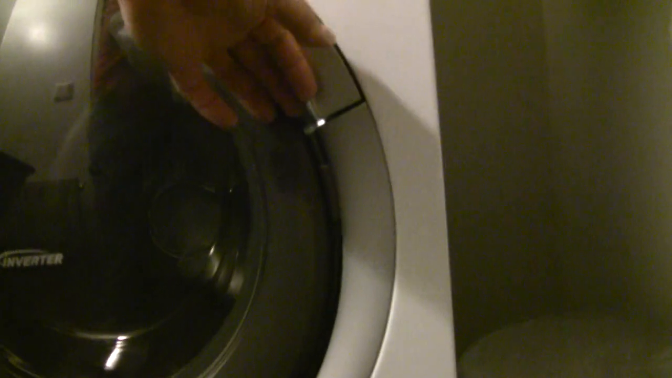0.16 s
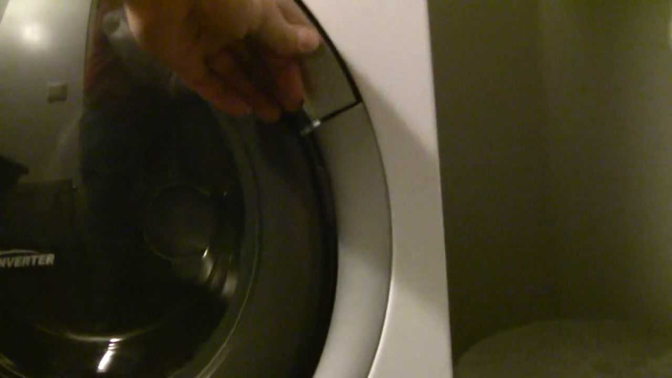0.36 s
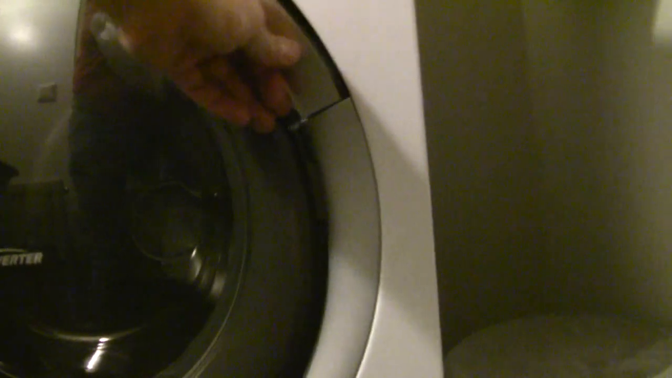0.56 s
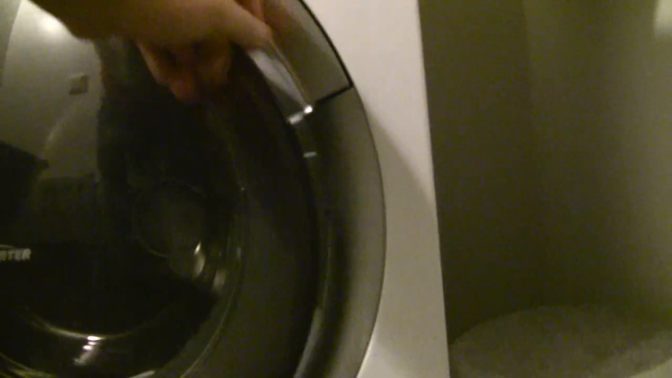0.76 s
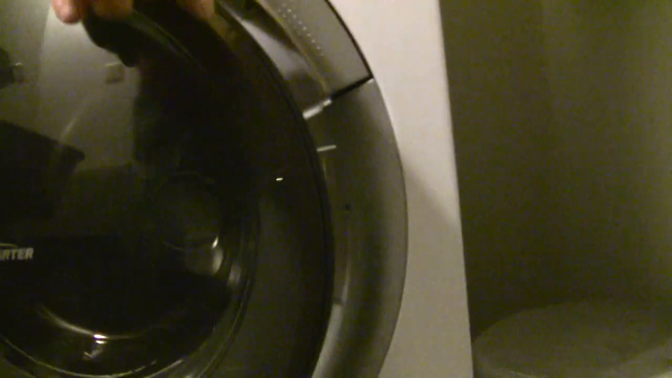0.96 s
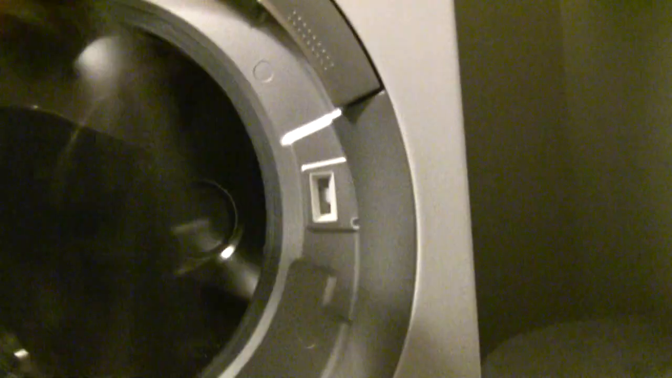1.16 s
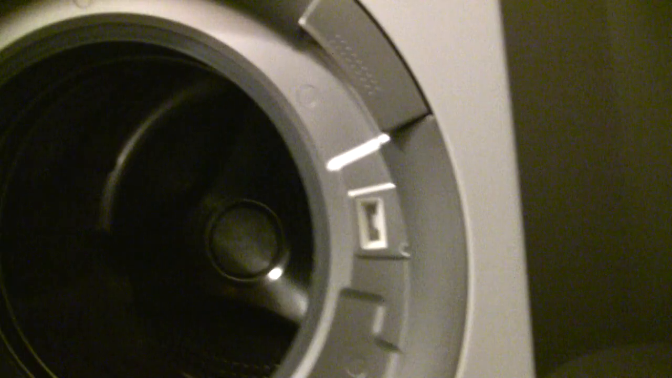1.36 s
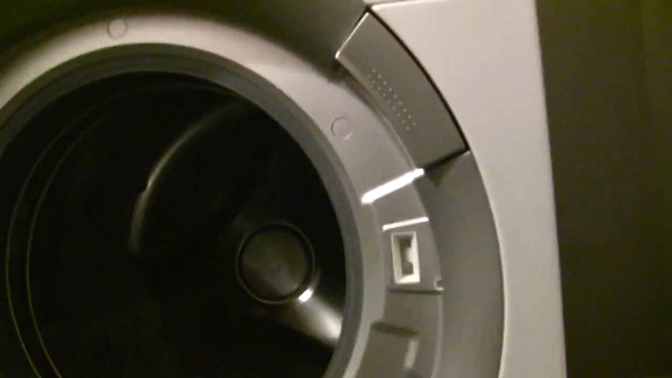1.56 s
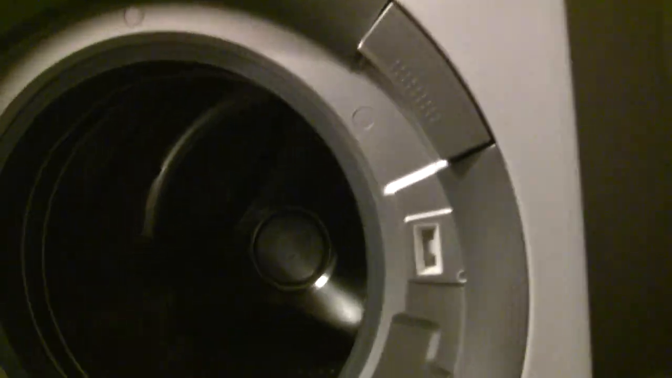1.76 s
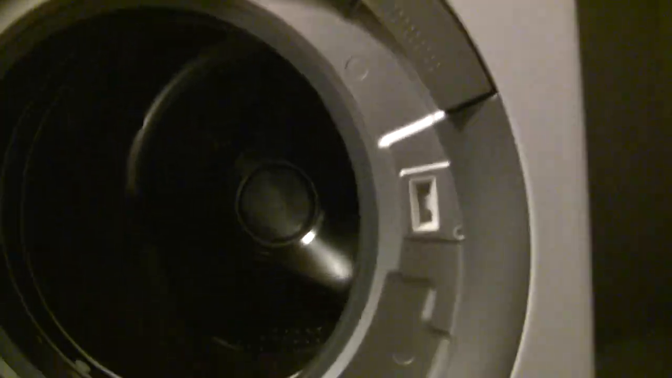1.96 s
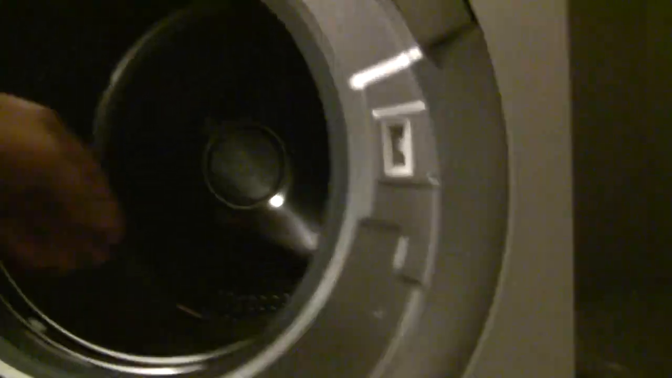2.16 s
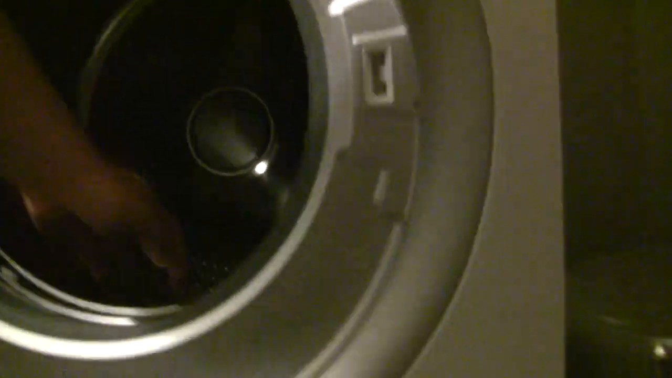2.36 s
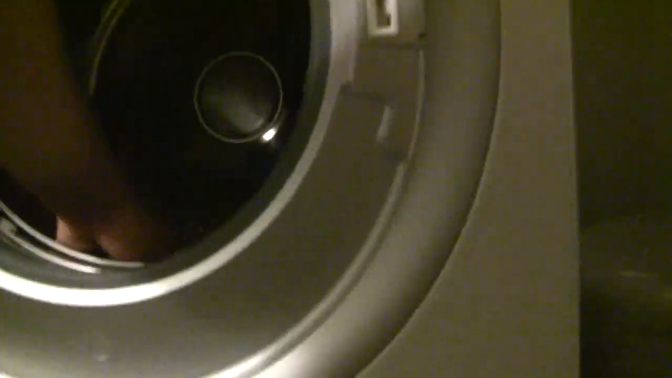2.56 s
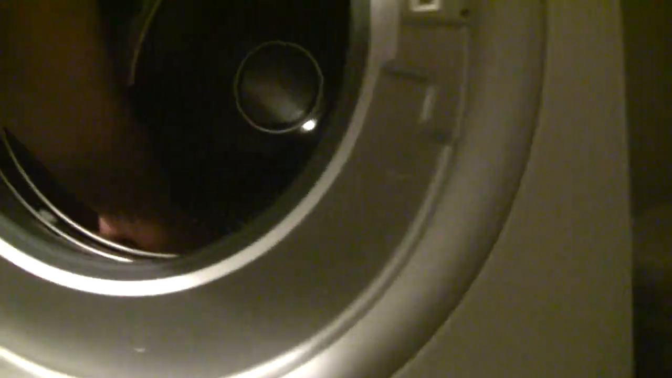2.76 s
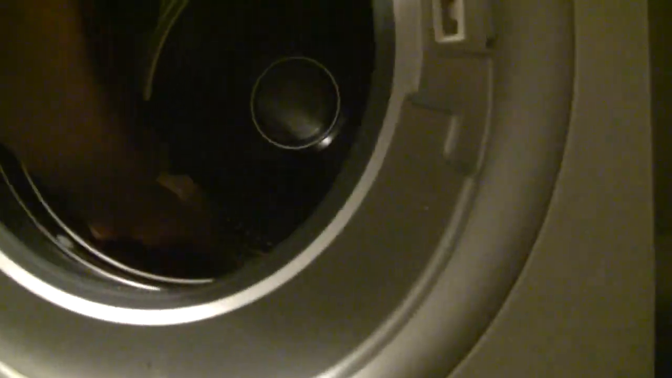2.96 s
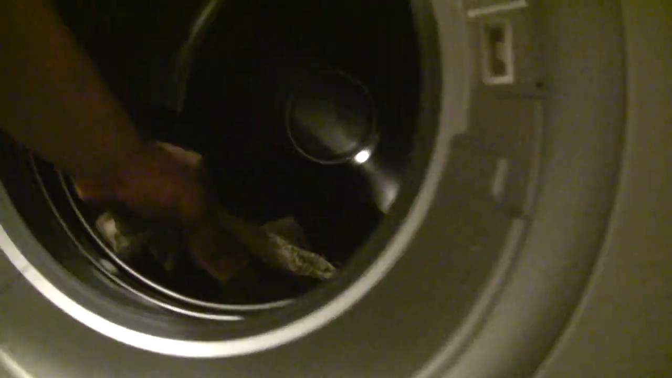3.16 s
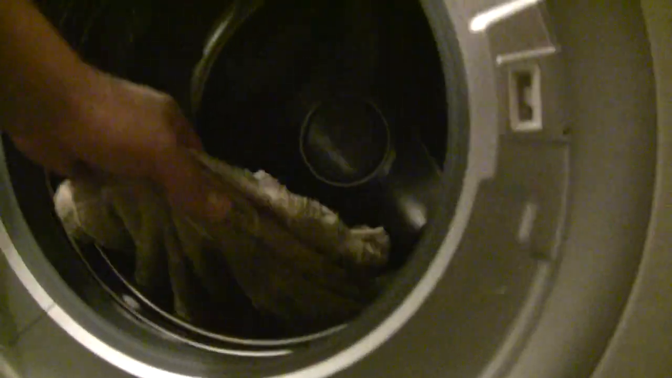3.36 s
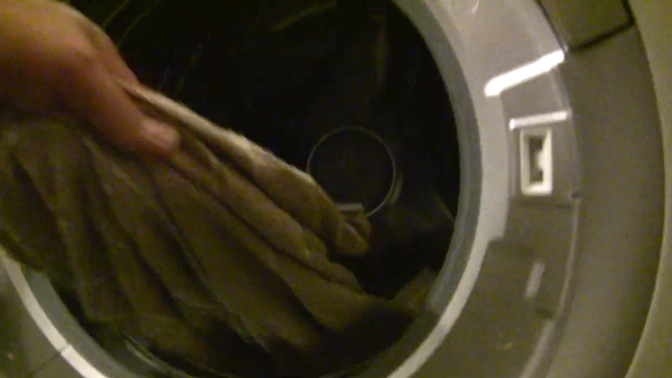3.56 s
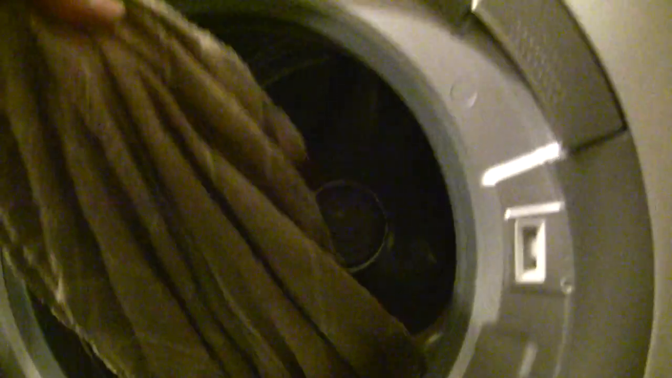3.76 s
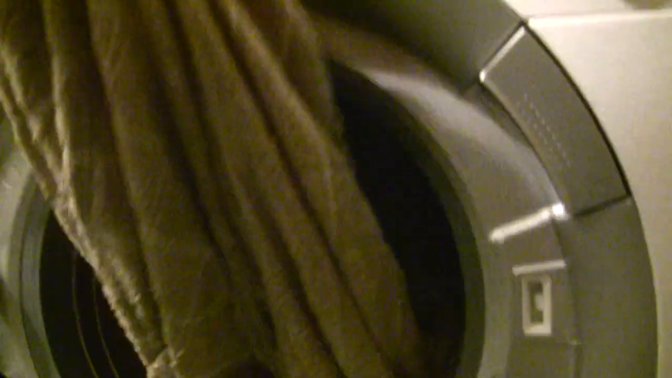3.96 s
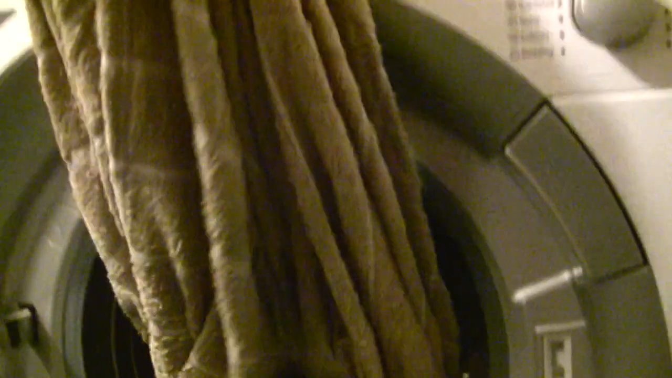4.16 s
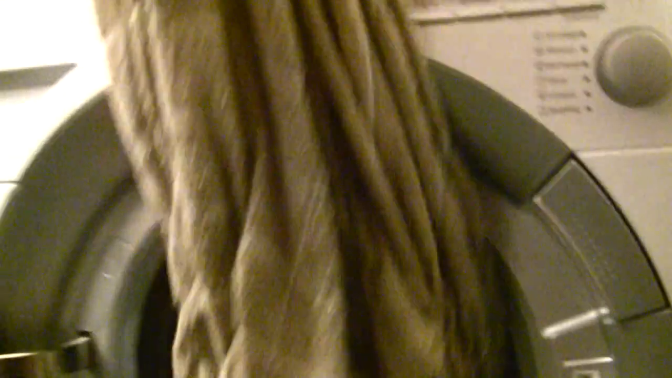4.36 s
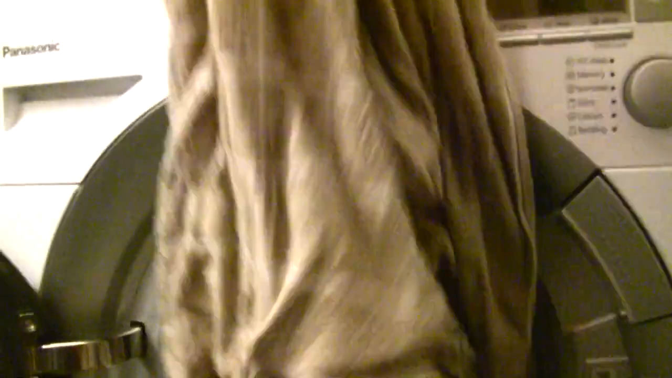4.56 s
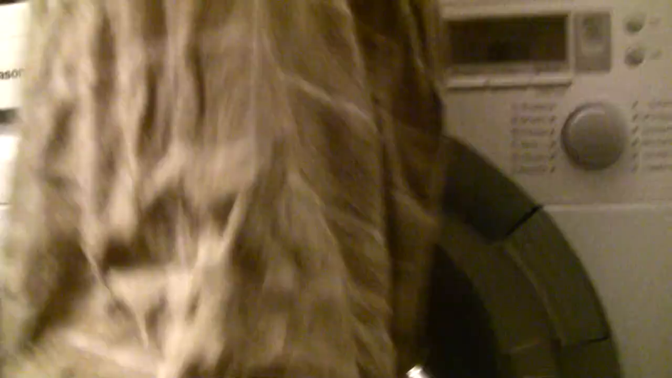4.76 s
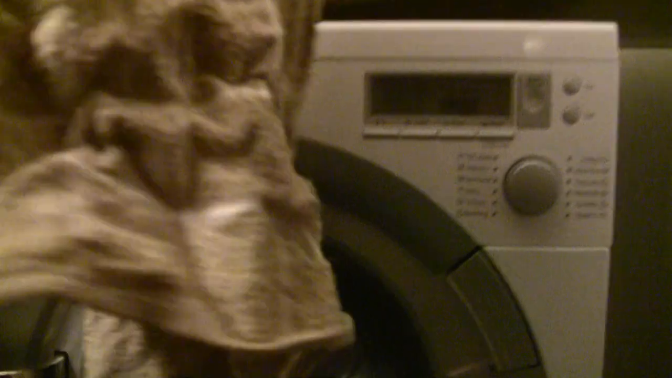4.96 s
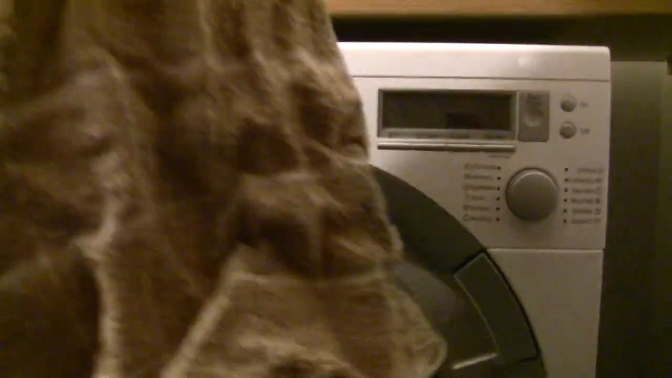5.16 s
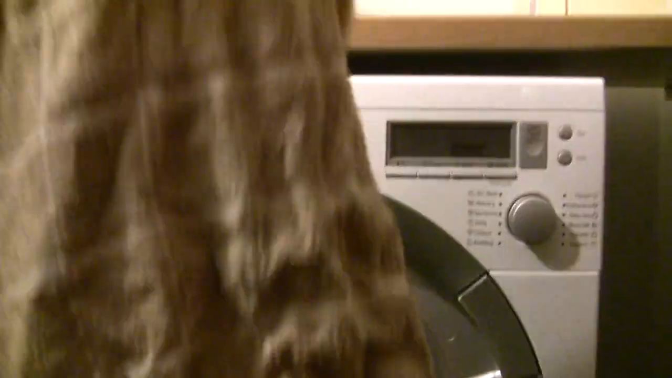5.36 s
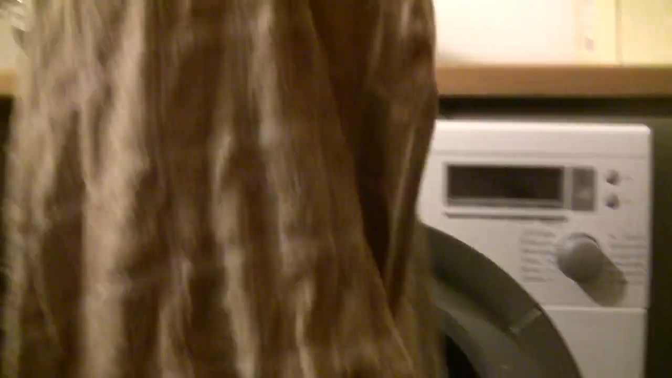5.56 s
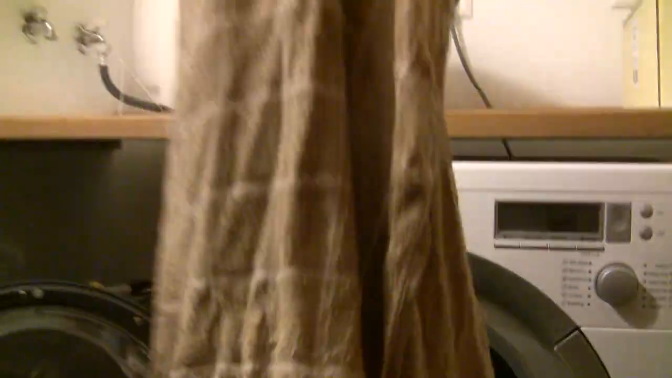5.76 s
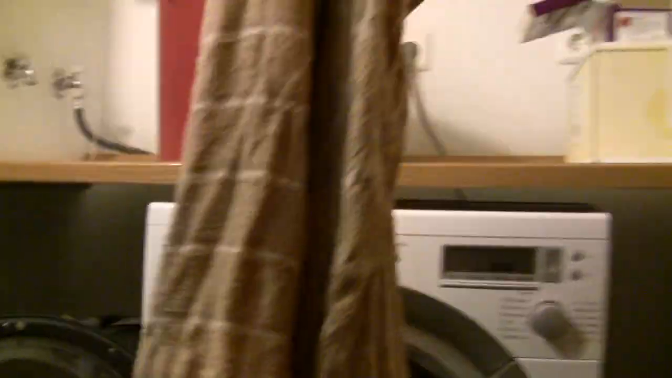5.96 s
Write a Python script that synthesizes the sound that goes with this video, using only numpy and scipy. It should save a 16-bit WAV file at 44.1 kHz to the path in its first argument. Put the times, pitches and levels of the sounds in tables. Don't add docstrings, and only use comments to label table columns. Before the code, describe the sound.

Close up in a small hard room, a washer door unlatches with hard snaps, the drum gets knocked, and a heavy blanket rustles out.

```python
import sys
import numpy as np
from scipy import signal
from scipy.fft import rfft, irfft
from scipy.io import wavfile
from scipy.ndimage import uniform_filter1d

SR = 44100
rng = np.random.default_rng(int(sys.argv[2]) if len(sys.argv) > 2 else 0)


def volts_from_decibels(level):
    exponent = np.asarray(level, float) / 20
    return 10 ** exponent


def pcm_store(signal):
    levels = np.round(np.clip(np.atleast_2d(signal), -1, 1) * 32767)
    wavfile.write(sys.argv[1], SR, levels.astype(np.int16).T)


N = 265305


def read(table, hz):
    at, value = np.transpose(table)
    return np.interp(np.log(np.maximum(hz, 1)), np.log(at), value)


def unit(x):
    return x / np.sqrt(np.mean(x ** 2))


def band(x, lo_hz, hi_hz):
    edges = [lo_hz, min(hi_hz, SR * 0.45)]
    return signal.sosfilt(signal.butter(2, edges, "bandpass", fs=SR, output="sos"), x)


def balance(pan_db):
    return volts_from_decibels(np.array([[pan_db], [-pan_db]]) / 2)


def causal(db):
    cep = irfft(db * np.log(10) / 20)
    half = len(cep) // 2
    cep[1:half] *= 2
    cep[half + 1:] = 0
    return np.exp(rfft(cep))


def two_ears(mid, side, hz):
    # pitch in Hz, left-right likeness from 0 to 1
    likeness = [(80, 0.997), (300, 0.982), (1200, 0.8), (2500, 0.64), (6500, 0.22)]
    c = np.clip(read(likeness, hz), 0, 1)
    return np.sqrt(1 + c) * mid + np.sqrt(1 - c) * side * np.array([[1], [-1]])


def pair(hz, count):
    mid, side = rng.standard_normal((2, count))
    return two_ears(mid, side, hz)


def walk(rate):
    k = int(SR / rate)
    held = np.repeat(rng.standard_normal(2000), k)[:N]
    return 1.38 * uniform_filter1d(uniform_filter1d(held, k), k)


def swells(moves, bands_db, centre, rest_db=-99):
    s, db, rise, fall, bright_db = np.transpose(moves)[:, :, None]
    late = np.arange(0, N + 64, 64) / SR - s
    rising, falling = -late / np.maximum(rise, 0.005), late / np.maximum(fall, 0.005)
    env_db = db - 10 * np.where(late < 0, rising, falling)
    coarse = [np.sum(volts_from_decibels(env_db + b + bright_db * (k - centre)) ** 2, axis=0)
              for k, b in enumerate(bands_db)]
    smooth = uniform_filter1d(np.repeat(coarse, 64, axis=1), 64)[:, :N]
    return smooth + volts_from_decibels(np.reshape(rest_db, (-1, 1))) ** 2


def blows(events, part, part_tilt_db=0.0, harder_db=0.0551, spread=0.011, swell_ms=0.99, size=8192):
    colour, modes = part
    t, hz = np.arange(size) / SR, np.fft.rfftfreq(size, 1 / SR)
    mode_hz, mode_db, t60 = np.transpose(modes)[:, :, None]
    fade = np.exp(-np.log(1000) * t / np.clip(t60, 0.01, 0.22))
    out = np.zeros((2, N + size))
    for s, db, length_ms, ring_db, pan_db in events:
        tilt_db = part_tilt_db - 0.24 + harder_db * db
        shape = (1 - np.exp(-t / 0.00025)) * np.exp(-t / (length_ms / 1000))
        mid, side = rfft(rng.standard_normal((2, size)) * shape)
        crack_db = read(colour, hz) + tilt_db * np.log2(np.maximum(hz, 40) / 1000)
        crack = irfft(two_ears(mid, side, hz) * causal(crack_db))
        ring = 0
        for level_luck, pitch_luck in rng.standard_normal((3, 2, len(modes), 1)):
            gain = volts_from_decibels(mode_db + 1.8 * level_luck + tilt_db * np.log2(mode_hz / 1000))
            partial = np.sin(2 * np.pi * mode_hz * (1 + spread * pitch_luck) * t)
            ring = ring + np.sum(gain * fade * partial, axis=0)
        ring *= 1 - np.exp(-t / (swell_ms / 1000))
        sound = crack / np.abs(crack).max() + volts_from_decibels(ring_db) * ring / np.abs(ring).max()
        at = int(s * SR)
        out[:, at:at + size] += sound * volts_from_decibels(db) * balance(pan_db)
    return out[:, :N]


def latch():
    events = [
        (0.1715, -41, 4.3, -22, 1),
        (0.3905, -8, 10.4, -16.5, -0.5),
    ]
    part = [
        [(120, -58), (200, -39), (777, 0), (1680, -11.5), (1940, -9), (3250, -3), (3560, -1), (8120, -1), (16000, -25)],
        [(1980, 6, 0.2), (2326, 10, 0.31), (3800, -22, 0.52), (4130, -8, 0.4), (5297, -2, 0.16), (7600, -12, 0.18), (7930, 4, 0.58), (9670, -7, 0.099), (11950, -45, 0.11)],
    ]
    return blows(events, part, part_tilt_db=1.5, spread=0.0019)


def handle():
    events = [
        (0.4975, -2.5, 5.7, -11.5, 0.0),
        (0.508, -8, 4.2, -6.5, -0.5),
        (0.529, -16.5, 3.1, -11, -0.5),
        (0.545, -23, 3, -6, -0.5),
    ]
    part = [
        [(71, -86), (120, -36), (181, -11), (684, -1), (874, -12.5), (1340, 3.5), (2870, -20.5), (3380, -11), (7660, -24.5), (11300, -17.5), (16000, -28)],
        [(241.5, -1, 0.3), (587, -4, 0.4), (713, 8, 0.16), (1015, 12, 0.046), (1290, 13.5, 0.071), (1420, -21, 0.4), (1930, -4, 1.4), (2330, -28.5, 0.74), (2850, -6, 0.36), (5170, 9, 0.052)],
    ]
    return blows(events, part)


def hook():
    events = [
        (0.706, -11.5, 2.5, -6.5, -0.35),
        (0.709, -5, 2.7, -9, -0.15),
        (0.712, -8, 6.4, -8, 1.6),
        (0.72, -20.5, 2.5, 4, -0.5),
        (0.738, -21, 5, 1, -0.5),
        (0.752, -30, 3.4, -4, -0.5),
        (0.823, -43, 1.5, -3, -0.5),
        (0.784, -27, 1.3, -3, -1.0),
        (0.863, -21, 1.6, -3, -0.32),
    ]
    part = [
        [(120, -67), (200, -37), (1160, -1), (1500, -1), (1680, 2.5), (2170, -10.5), (3070, -5.5), (3760, -10.5), (5840, -11), (16000, -42.5)],
        [(780, -9, 0.03), (1150, -14, 0.064), (1702, 2.5, 0.05), (1864, -8, 0.12), (2060, -5.5, 0.063), (2376, -16, 0.12), (3030, -6.5, 0.041), (3520, -11, 0.061), (3880, -13, 0.1), (4220, -13, 0.054), (5500, -20, 0.056), (7240, -28, 0.18)],
    ]
    return blows(events, part)


def seal():
    events = [
        (0.91, -15.5, 9.8, -20, -0.54),
    ]
    part = [
        [(120, -62), (200, -26), (519, -7), (671, 0.5), (1140, -12), (1300, -8), (3310, -12), (16000, -24.5)],
        [(683, -8, 0.026), (2220, -22, 1.2), (3320, -6, 0.03)],
    ]
    return blows(events, part)


def door():
    events = [(0.002, -45, 7.2, 9, -1.3), (0.018, -45, 5.4, 8, -1), (0.112, -43.5, 6, 6, -2),
              (0.638, -35, 2.9, -1.5, -0.34), (0.945, -24, 8.7, -4, -0.34),
              (0.975, -31.5, 7.7, -1.5, -0.19), (1.05, -46, 8, 5, -0.5), (1.11, -46.5, 11, 3.5, -0.5),
              (1.17, -40.5, 11, 0.5, -0.5), (1.357, -35.5, 14, -9, -1.3), (4.312, -38.5, 16, 3, -0.85)]
    part = [
        [(35, -46), (60, -17), (529, -7), (1240, -23), (1390, -20), (1650, -43), (2380, -41), (6000, -44), (7800, -60), (13200, -120)],
        [(232.7, 3.5, 0.57), (284.6, 4, 0.46), (370, -3.5, 0.3), (416.5, -1, 0.3), (528, 2, 0.077), (1040, -20, 0.35)],
    ]
    return blows(events, part)


def thud():
    events = [
        (0.939, -21.5, 4, 9, -0.3),
        (0.9505, -18, 1.7, -4.5, -0.3),
        (0.988, -31, 4, -3, -0.3),
    ]
    part = [
        [(150, -32.5), (350, -9), (490, -1.5), (1000, -12), (4000, -40)],
        [(283, -8, 0.067), (491, 1.5, 0.04), (685, -7.5, 0.057), (1083, -19, 0.05)],
    ]
    return blows(events, part, swell_ms=3.2)


def drum():
    events = [
        (2.687, -4.5, 11.3, -17, 0.17),
        (2.697, -7, 6, -4, -0.37),
        (2.708, -12, 3.3, -4.5, -0.3),
        (2.74, -15.5, 6, -4.5, -0.3),
        (2.764, -25.5, 5.9, -8, -0.3),
        (2.842, -21, 6.8, -0.5, -0.5),
        (2.852, -25, 7.3, -4, -0.5),
    ]
    part = [
        [(53, -22), (90, -8.5), (170, -3), (270, -2), (499, -6), (769, -8.5), (1610, -8), (1720, -14), (1870, -13), (3150, -20.5), (3660, -21), (13200, -30), (16000, -37)],
        [(183.5, 2, 0.073), (247.3, 6, 0.16), (277, 3, 0.15), (378, -7.5, 0.17), (487, 3.5, 0.17), (561, -7, 0.2), (691, -5, 0.25), (944, 9.5, 0.035), (1090, 5.5, 0.1), (1145, -4, 0.24), (1614, -3, 0.079), (2090, -18, 0.08)],
    ]
    return blows(events, part, part_tilt_db=0.57, harder_db=0.12)


def rim():
    events = [
        (3.672, -47, 8, 0, -1.3),
        (3.701, -30.5, 6, -1, -0.5),
        (3.776, -26, 8, -7, -0.5),
        (3.809, -33, 15, -5, -1.5),
        (3.842, -28.5, 6.7, -29.5, -0.5),
        (3.864, -29, 6.1, -21, -1.0),
        (4.451, -38, 3.1, -4, -0.5),
        (4.461, -40, 4.2, -6, -0.5),
        (4.49, -37, 3, -12, -0.5),
        (4.515, -37, 4.5, -1, -0.64),
    ]
    part = [
        [(120, -48), (200, -29), (531, 2), (1250, -6.5), (1760, -22), (2800, -6.5), (4370, -24), (12000, -61), (15600, -82), (22000, -120)],
        [(306, -12.5, 0.38), (537, 4, 0.042), (962, -8, 0.11), (1186, -4, 0.084), (1304, -5, 0.13), (2720, -24, 0.69), (3600, -20, 0.1)],
    ]
    return blows(events, part)


def button():
    events = [
        (4.148, -41, 2.2, -25, -3),
        (5.353, -34.5, 1.8, -33, -10.5),
        (5.567, -24, 2.6, -13, 6.5),
        (5.638, -37, 5.5, -25, -7),
        (5.889, -37, 6.1, -26, 2),
        (5.898, -41, 4, -20, 0),
        (5.908, -33, 4, -10, -3),
        (5.918, -41, 4, -20, 0),
        (5.932, -42, 5, -22, 0),
    ]
    part = [
        [(180, -32), (400, -10), (1320, -5.5), (2650, -1.5), (3580, -13), (5080, -6.5), (7500, -14), (16000, -20)],
        [(1970, -1, 0.02), (2760, -1, 0.024)],
    ]
    return blows(events, part)


def knock():
    events = [
        (0.09, -33, 5.1, -3.5, 0.4),
        (1.757, -35, 5.3, -0.5, 0.51),
        (2.063, -24.5, 17, -8.5, -0.1),
        (2.436, -36.5, 20, 1, -0.6),
    ]
    part = [
        [(60, -21), (110, 0), (406, -0.5), (712, -6), (1080, -5), (1600, -13), (3070, -17), (12000, -41), (16000, -58)],
        [ (271.3, -1, 0.21), (498, -5, 0.12), (932, 0.5, 0.068), (1090, 3.5, 0.067), (1510, 3, 0.057)],
    ]
    return blows(events, part, part_tilt_db=1.5)


def knuckle():
    events = [
        (3.133, -24, 5.4, 0, -0.3),
        (3.139, -27, 6.7, 0, -0.3),
        (3.152, -30, 10, -2, -0.3),
    ]
    part = [
        [(80, -10), (190, -2.5), (500, -1.5), (1120, -3), (2500, -10.5), (5000, -20), (16000, -52)],
        [ (200, 1, 0.067), (266, -2.5, 0.23), (500, -1, 0.064), (691, -10, 0.12), (1110, 2.5, 0.095), (1567, -4, 0.06), (2420, -5, 0.036)],
    ]
    return blows(events, part)


def snap():
    events = [
        (0.0882, -39.5, 2.3, -20, 1.1),
        (0.239, -61, 9.5, -30, 0.3),
        (0.3905, -15.5, 1.5, -27, 0.33),
        (0.498, -3.5, 0.8, -30, 1.5),
        (1.578, -41, 5, -30, 0.3),
        (2.687, -11, 0.82, -30, 0.5),
        (3.176, -40, 1.5, -34, 0.3),
        (3.496, -30.5, 2.6, -28, 2),
    ]
    part = [
        [(500, -42), (1500, -9.5), (4000, 4.5), (8500, -4), (14000, -9.5), (16500, -26)],
        [(5200, -1, 0.015), (9000, -1, 0.015)],
    ]
    return blows(events, part, part_tilt_db=1.4)


def tap():
    events = [
        (2.585, -35.5, 3.5, -25, 0.3),
        (2.8265, -22, 6.4, -19, 0.3),
        (2.844, -34, 2.6, -24, 0.3),
        (0.172, -41, 9.1, -25, 0),
        (3.4965, -33, 3, -25, 1),
    ]
    part = [
        [(300, -21), (800, 0), (1600, -3), (5600, -10), (8000, -21), (10000, -40), (16000, -55)],
        [(5470, -1, 0.02)],
    ]
    return blows(events, part, part_tilt_db=-1.5)


def flops():
    events = [
        (4.468, -42.5, 6, 4, -0.5),
        (4.51, -43, 6, 5, -0.5),
        (4.648, -46, 8, 4, -0.5),
        (3.457, -43, 3.7, 5, -1),
        (4.299, -38, 3, -10, -0.5),
    ]
    part = [
        [(120, -25), (260, -2), (450, -2), (850, -3), (2000, -26), (8000, -60)],
        [(256, -1, 0.07), (450, -2, 0.05)],
    ]
    return blows(events, part, swell_ms=3.0)


def room(x, size=24000):
    # pitch in Hz, time to fade by 60 dB in seconds
    fade_times = [(60, 0.16), (250, 0.44), (1000, 0.22), (4000, 0.25), (14000, 0.18)]
    t, edges = np.arange(size) / SR, np.geomspace(35, 18000, num=15)
    tail = 0
    for lo, hi in zip(edges[:-1], edges[1:]):
        fade = np.exp(-np.log(1000) * t / read(fade_times, np.sqrt(lo * hi)))
        tail = tail + band(pair(lo, size), lo, hi) * fade
    tail *= 1 - np.exp(-t / 0.0074)
    tail /= np.sqrt(np.sum(tail ** 2) / 2)
    return signal.fftconvolve(x.mean(axis=0, keepdims=True), tail, axes=1)[:, :N]


def cloth():
    folds = [(0.0, -54, .1, 0.2, 2), (0.565, -38.5, 0.051, 0.03, 9), (0.712, -46, 0.091, 0.068, 14.5),
             (0.808, -33, 0.11, 0.029, 1.5), (0.95, -69, 0.07, 0.25, -10), (1.2, -56, 0.052, 0.026, -11),
             (1.366, -63, 0.0089, 0.021, -19), (1.785, -46.5, 0.024, 0.035, -13),
             (1.916, -58, 0.11, 0.041, -9), (2.078, -38, 0.01, 0.062, -1), (2.452, -51, 0.031, 0.07, 4),
             (2.66, -58.5, 0.34, 0.067, 12), (2.832, -33, 0.024, 0.079, -6.5), (3.2, -51, 0.23, 0.27, 2.5),
             (3.33, -49, 0.21, 0.036, 2), (3.49, -49, 0.14, 0.51, 3), (3.7, -43, 0.075, 0.044, -17),
             (3.79, -47, 0.04, 0.075, 13.5), (4.33, -41.5, 0.029, 0.08, 2), (4.47, -40.5, 0.029, 0.1, -12),
             (4.63, -42.5, 0.42, 0.096, 4)]
    swishes = [(0.38, -70, 0.39, 0.39, -12), (0.62, -54.5, 0.63, 0.19, 2), (0.72, -52.5, 0.11, 0.11, -13),
               (1.206, -52.5, 0.11, 0.11, 2), (1.58, -54, 0.13, 0.055, 0), (1.814, -51.5, 0.039, 0.063, 1),
               (2.14, -48.5, 0.097, 0.065, 3), (2.4, -55, 1, 1, -3), (2.54, -55.5, 0.16, 0.39, 3),
               (2.99, -53, 0.11, 0.28, 2), (3.24, -54, 0.053, 0.11, 5.5), (3.49, -58.5, 0.078, 0.28, -4),
               (3.6, -55, 0.18, 0.51, 8), (3.7, -56, 0.3, .5, 2), (4.0, -54, .6, 0.65, 4.5),
               (4.21, -44, 0.076, 0.096, 0.5), (4.47, -46.5, 0.13, 0.43, 1),
               (4.72, -43.5, 0.11, 0.029, 2.5), (5.02, -54, 0.17, 0.028, -1), (5.4, -50.5, 0.068, 0.065, 0),
               (5.55, -56, 0.083, 0.024, -3), (5.65, -53, 0.047, 0.48, -2), (5.9, -44, 0.011, 0.091, 2.5)]
    edges_hz = (170, 900, 3500, 9000, 16500)
    fold_db = (-2.5, -11, -35, -53)
    swish_db = (-15.5, -2.5, -3, -9.5)
    rest_db = (-61.5, -68.5, -95, -78)
    # pitch in Hz, level in dB per Hz
    colour = [(100, -38), (170, -10), (280, -1), (352, -5), (387, -2.5), (714, -5), (952, -9), (1270, -10),
              (11300, -26), (15300, -28.5), (16500, -47)]
    grain = volts_from_decibels(0.98 * walk(90))
    gains = np.sqrt(swells(folds, fold_db, 0, rest_db) + swells(swishes, swish_db, 2))
    out = 0
    for lo, hi, gain in zip(edges_hz[:-1], edges_hz[1:], gains):
        steps = np.geomspace(lo, hi, num=5)
        layer = 0
        for a, b in zip(steps[:-1], steps[1:]):
            flicker_db = 1.34 * walk(13)
            layer = layer + volts_from_decibels(read(colour, np.sqrt(a * b)) + flicker_db) * band(pair(a, N), a, b)
        out = out + unit(layer * grain) * gain
    return out


def rub(moves, tones):
    gains = np.sqrt(swells(moves, np.zeros(len(tones)), 0))
    return sum(gain * unit(band(pair(hz, N), hz - width / 2, hz + width / 2))
               for gain, (hz, width) in zip(gains, tones))


def seal_rubs():
    moves = [
        (1.2, -70, .08, 0.29, -10),
        (1.5, -65, 0.18, 0.11, -11),
        (3.25, -65, 0.055, .2, 3),
        (3.45, -62, 0.17, 0.33, -7),
        (3.75, -54.5, 0.29, 0.36, -4.5),
    ]
    # pitch in Hz, width in Hz
    tones = [
        (1320, 80),
        (3750, 200),
    ]
    return rub(moves, tones)


def squeaks():
    moves = [
        (4.62, -51, .04, .05, 0),
        (4.77, -57, .02, .15, 0),
        (4.83, -58, .05, .03, 0),
    ]
    # pitch in Hz, width in Hz
    tone = [
        (1250, 27),
    ]
    return rub(moves, tone)


def cabinet():
    shoves = [(0.03, -55, 0.087, .4, -8), (0.3, -53, .1, -0.5, 0), (0.55, -36.5, 0.04, 0.12, -1),
              (0.69, -44, 0.056, -0.43, 11), (0.82, -46, 0.15, 0.45, -9), (0.98, -44, 0.029, -0.28, 6.5),
              (1.385, -38, 0.018, -0.54, -19), (2.08, -53, 0.044, 0.37, -5), (2.71, -28.5, 0.023, 0.12, -7),
              (2.9, -35.5, 0.097, 0.07, -1), (3.1, -45, 0.2, 0.5, -17), (3.13, -58, 0.041, 0.5, -1),
              (3.27, -40, 0.046, -1.6, -15), (3.65, -56.5, 0.086, -6.5, 2.5), (3.89, -50, 0.072, 0.1, -15),
              (4.32, -43.5, 0.023, 0.1, -8), (4.52, -56.5, 0.19, 0.2, 8.5), (4.62, -54, 0.073, -1, -6)]
    rest_db = (-68, -70)
    boom_hz, width_hz = 67.8, 20.8
    boom_gain, panel_gain = np.sqrt(swells(shoves, (0, 0), 0, rest_db))
    boom = band(pair(boom_hz, N), boom_hz - width_hz / 2, boom_hz + width_hz / 2)
    boom = band(boom, 54, 210)
    panels = band(pair(boom_hz, N), 82, 135.5)
    return boom_gain * unit(boom) + panel_gain * unit(panels)


def hum():
    # pitch in Hz, width in Hz, level in dB
    resonances = [
        (99.4, 3, -62.5),
        (210.8, 14, -65),
        (249.8, 16.5, -61),
        (335.3, 20, -69.5),
    ]
    out = 0
    for hz, width, db in resonances:
        edges = hz - width / 2, hz + width / 2
        out = out + volts_from_decibels(db) * unit(band(band(pair(hz, N), *edges), *edges))
    return out


def motor():
    turn = 2 * np.pi * 22.8 * np.arange(N) / SR
    tone = np.sin(turn) + volts_from_decibels(-6.5) * np.sin(3 * turn)
    return volts_from_decibels(-58 + 1.4 * walk(3.15)) * np.sqrt(2) * tone


def capsules():
    # pitch in Hz, level in dB per Hz
    hiss_colour = [(24, -39), (45, -9), (120, -3.5), (249, -1.5), (516, -4.5), (1370, -11), (11800, -38.5),
                   (16000, -47)]
    colour = volts_from_decibels(read(hiss_colour, np.fft.rfftfreq(N, 1 / SR)))
    return volts_from_decibels(-52) * unit(irfft(rfft(rng.standard_normal((2, N))) * colour, N))


def scene():
    opening = latch() + handle() + hook() + seal() + door() + thud()
    hands = drum() + rim() + button() + knock() + snap() + tap() + knuckle()
    hits = opening + hands
    rest = cabinet() + cloth() + seal_rubs() + squeaks() + hum() + motor() + capsules()
    return hits + volts_from_decibels(-8) * room(hits) + flops() + rest * balance(-0.6)


def roll_off(x):
    return signal.sosfilt(signal.butter(12, 17330, fs=SR, output="sos"), x)


def record(dry):
    rumble_cut = signal.butter(2, 16, "highpass", fs=SR, output="sos")
    top_cut = signal.ellip(8, 0.2, 60, 16300, fs=SR, output="sos")
    rounded = np.tanh(0.63 * signal.sosfilt(rumble_cut, dry)) / 0.59
    return roll_off(signal.sosfilt(top_cut, rounded))


dry = scene()
out = record(dry)
pcm_store(out)
```